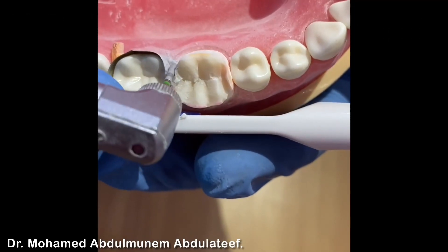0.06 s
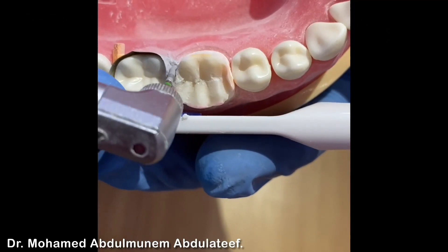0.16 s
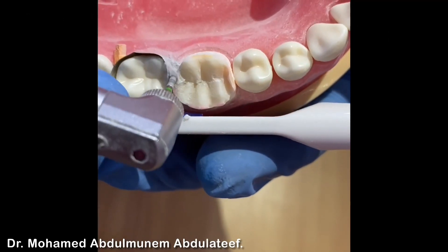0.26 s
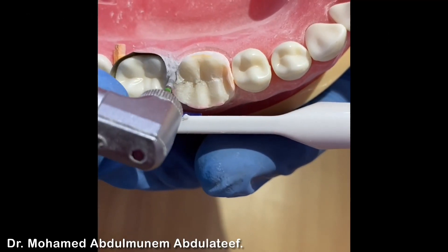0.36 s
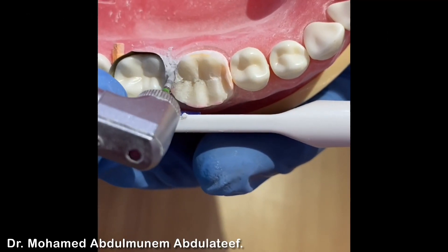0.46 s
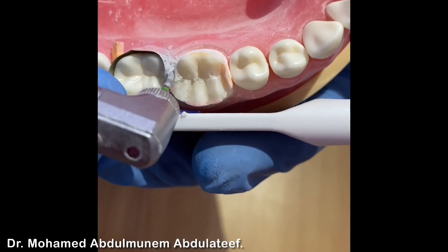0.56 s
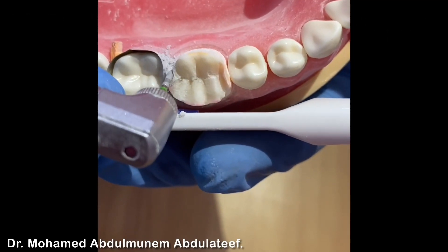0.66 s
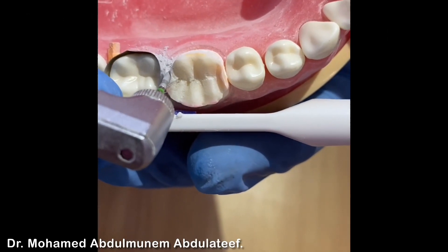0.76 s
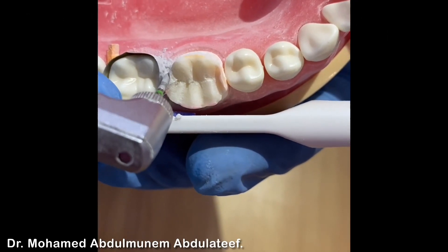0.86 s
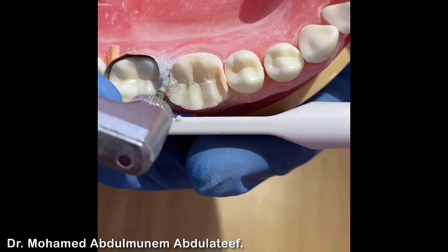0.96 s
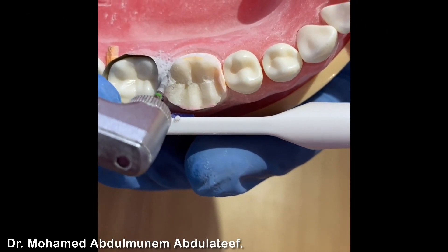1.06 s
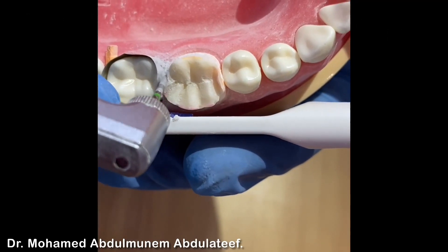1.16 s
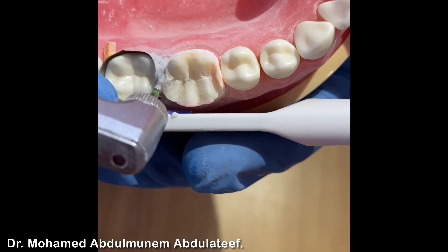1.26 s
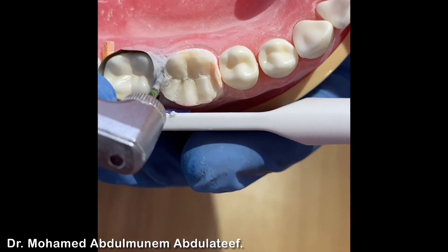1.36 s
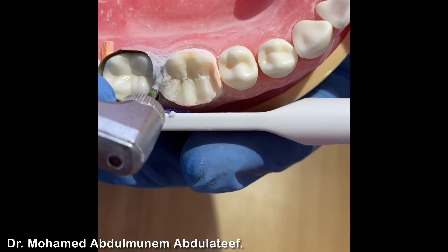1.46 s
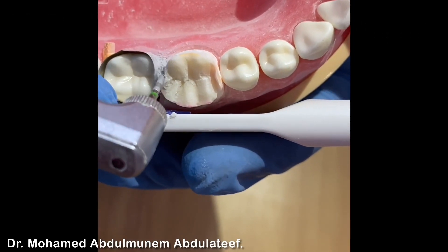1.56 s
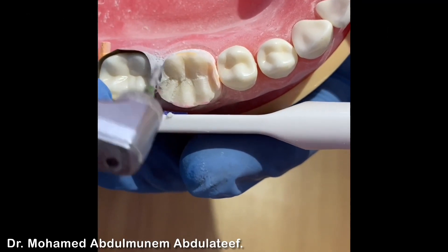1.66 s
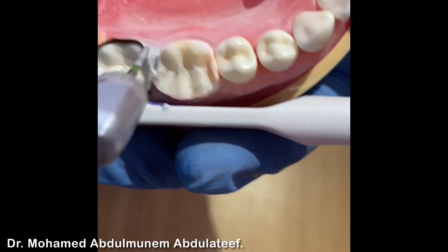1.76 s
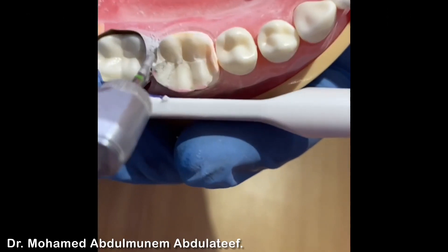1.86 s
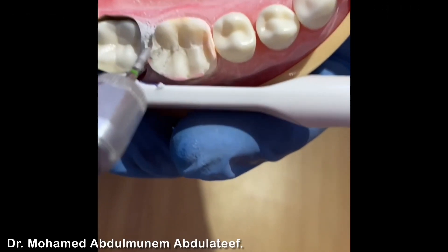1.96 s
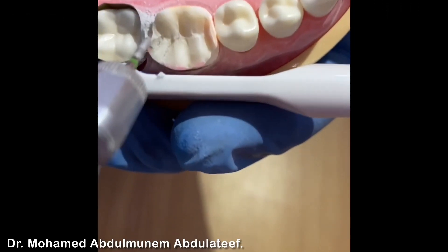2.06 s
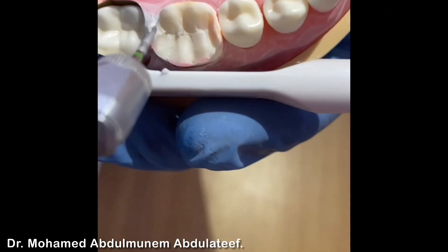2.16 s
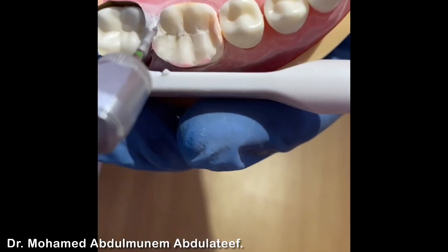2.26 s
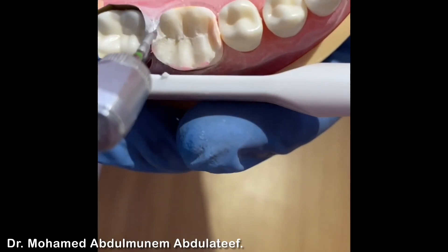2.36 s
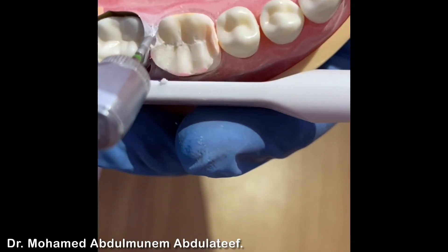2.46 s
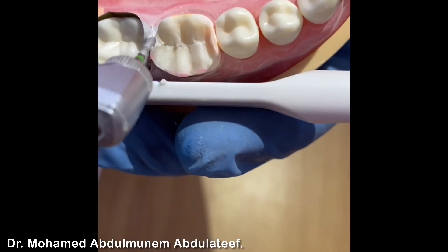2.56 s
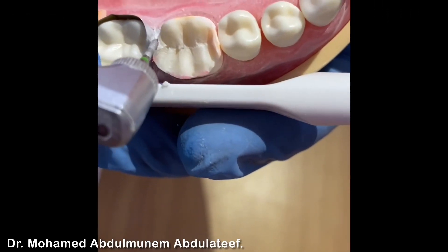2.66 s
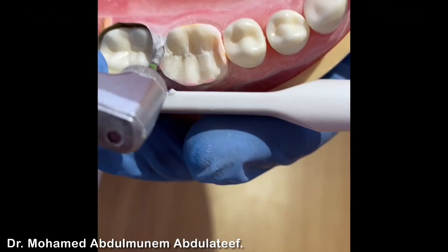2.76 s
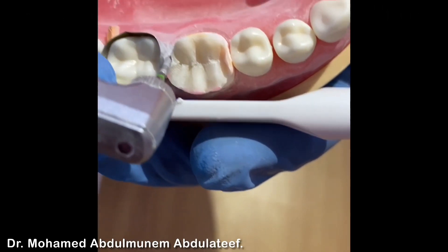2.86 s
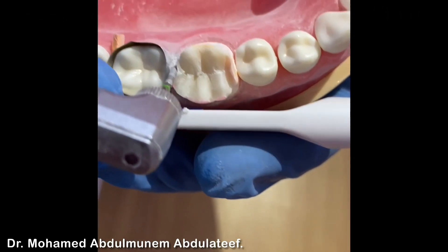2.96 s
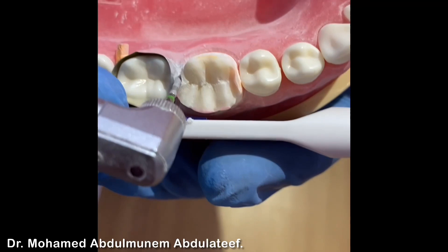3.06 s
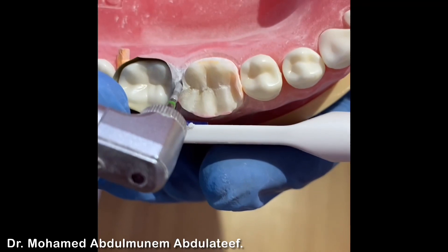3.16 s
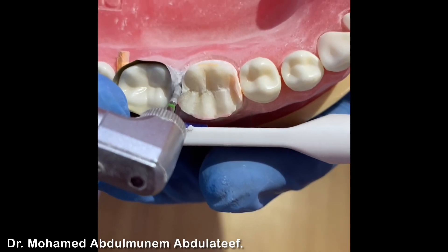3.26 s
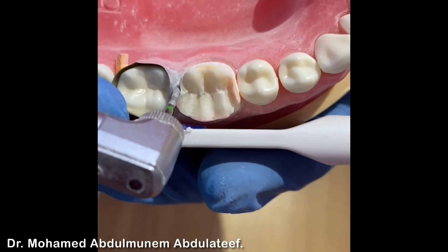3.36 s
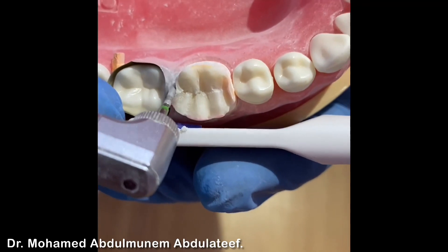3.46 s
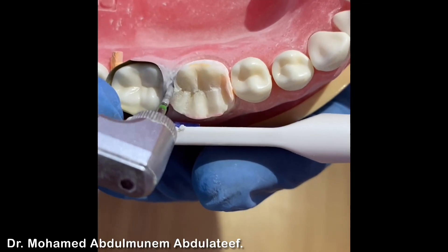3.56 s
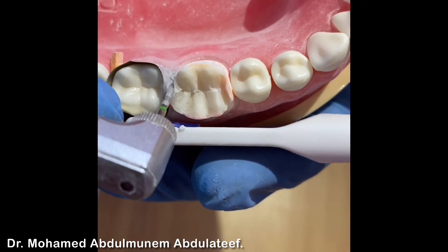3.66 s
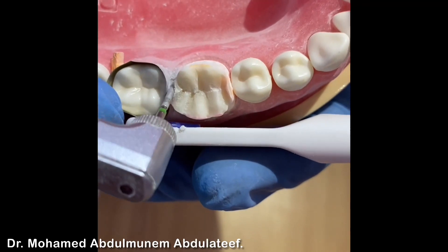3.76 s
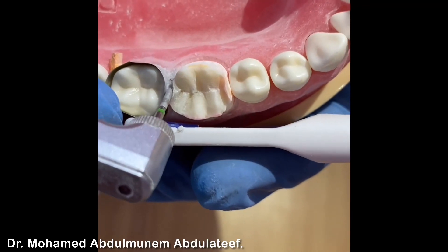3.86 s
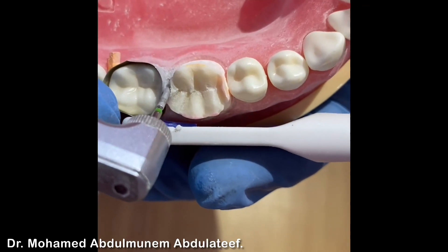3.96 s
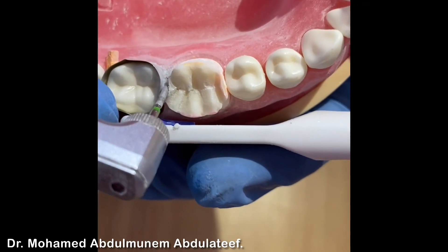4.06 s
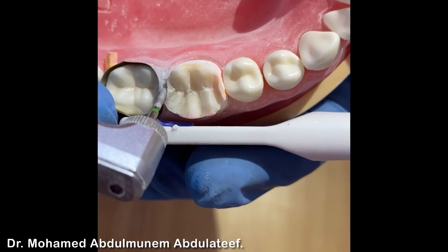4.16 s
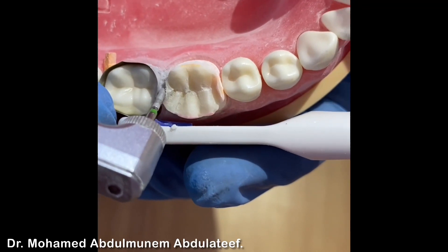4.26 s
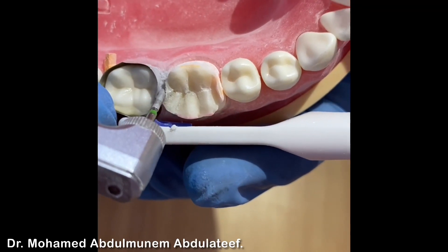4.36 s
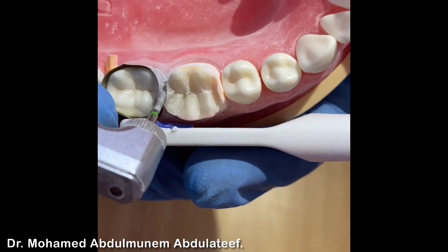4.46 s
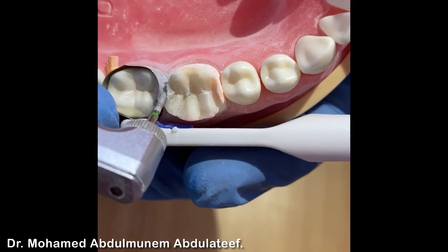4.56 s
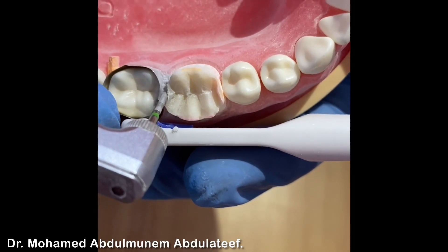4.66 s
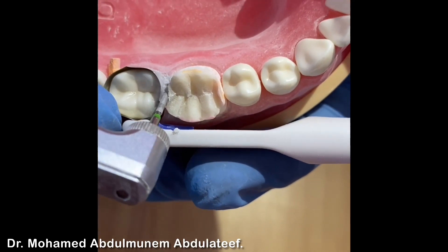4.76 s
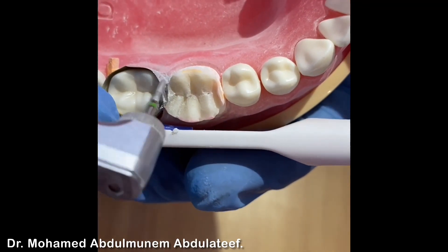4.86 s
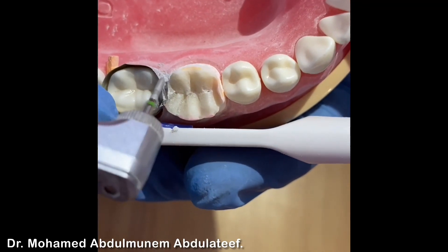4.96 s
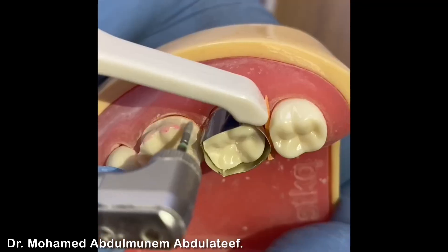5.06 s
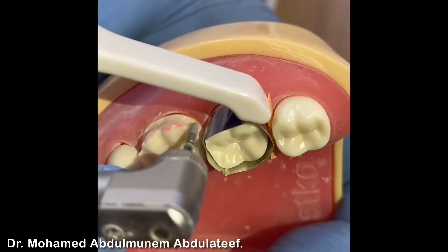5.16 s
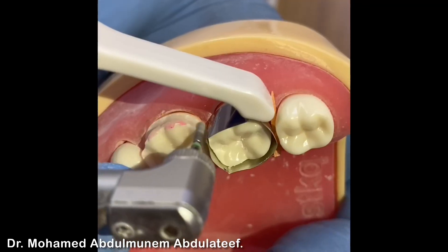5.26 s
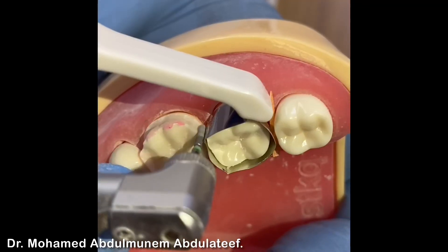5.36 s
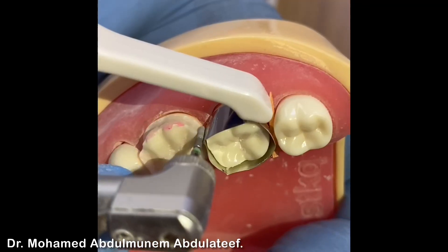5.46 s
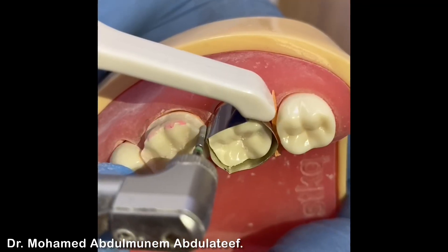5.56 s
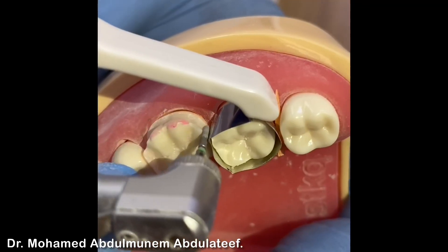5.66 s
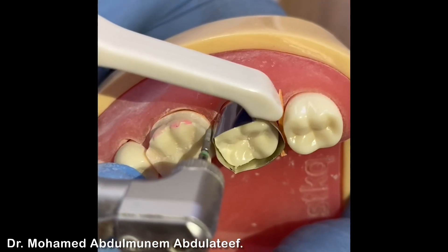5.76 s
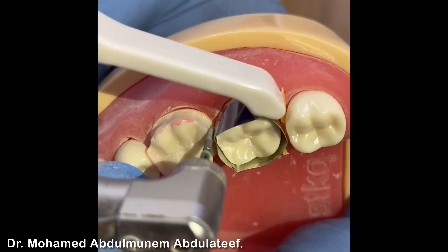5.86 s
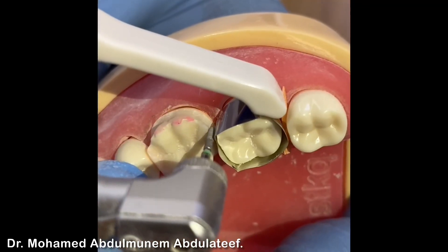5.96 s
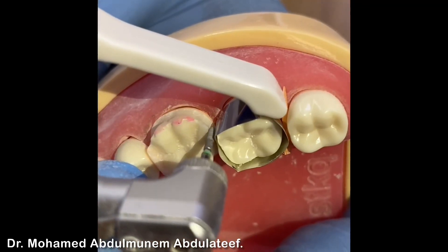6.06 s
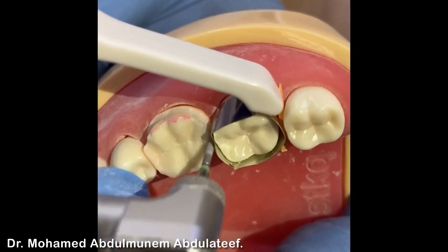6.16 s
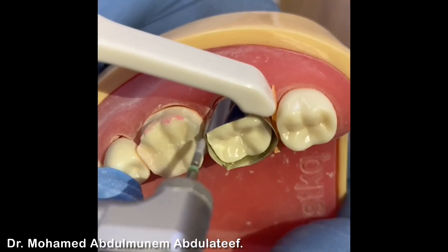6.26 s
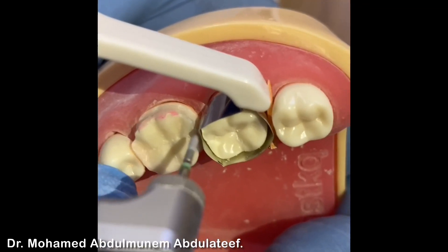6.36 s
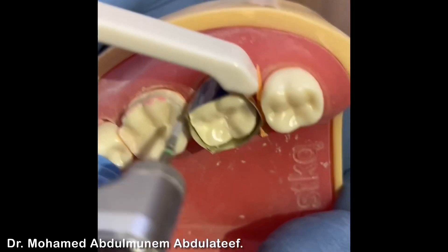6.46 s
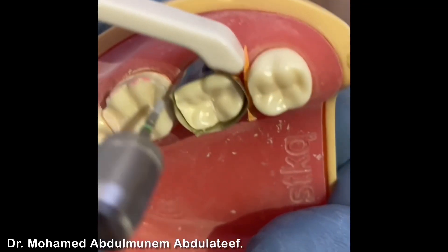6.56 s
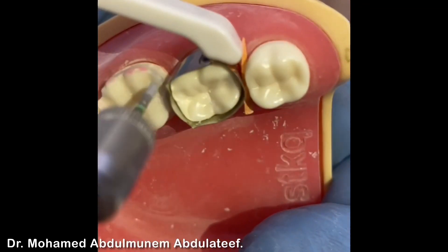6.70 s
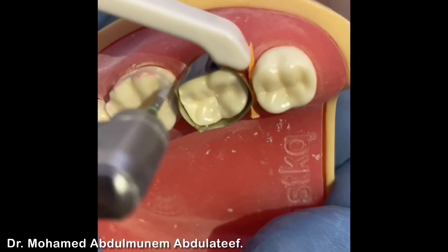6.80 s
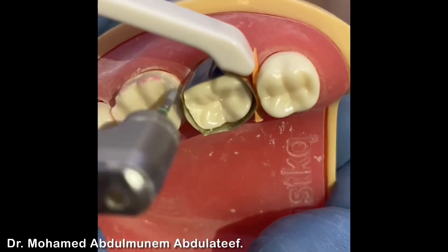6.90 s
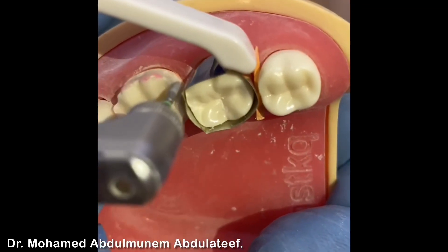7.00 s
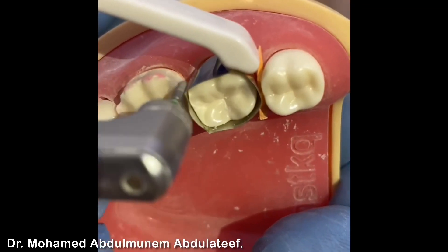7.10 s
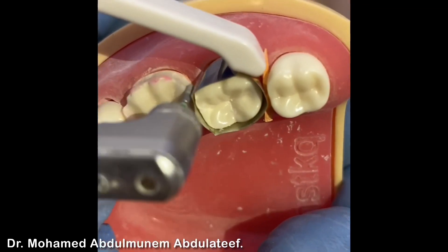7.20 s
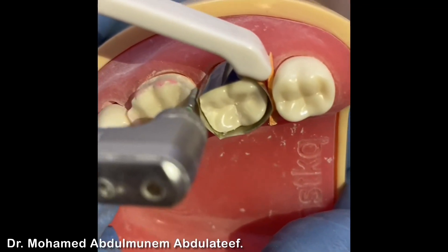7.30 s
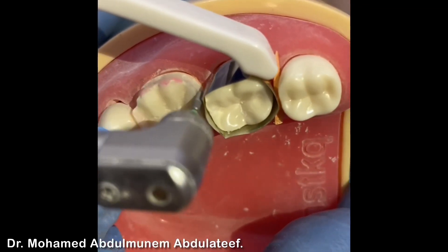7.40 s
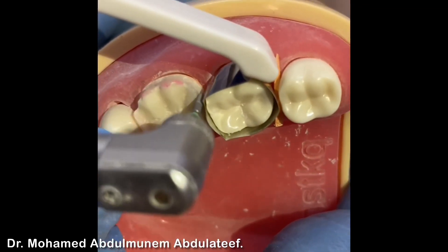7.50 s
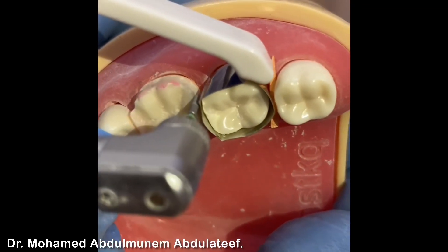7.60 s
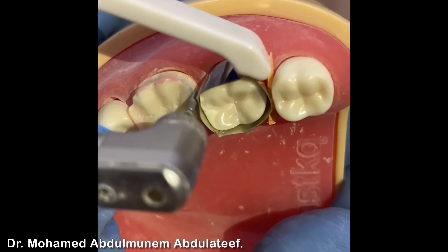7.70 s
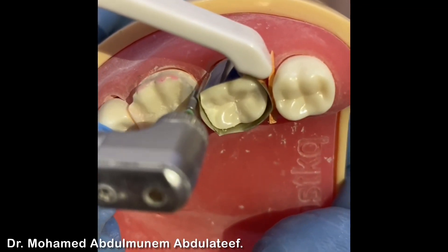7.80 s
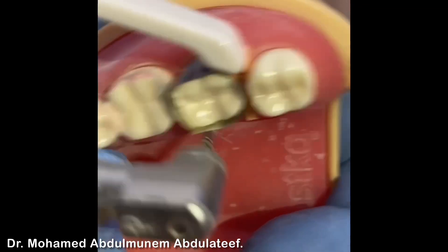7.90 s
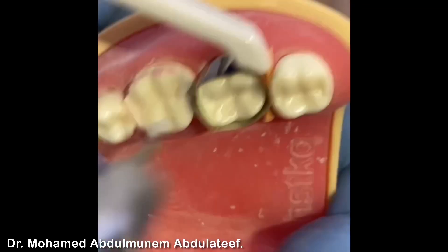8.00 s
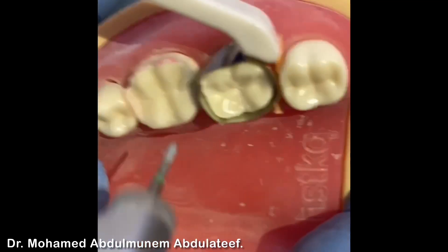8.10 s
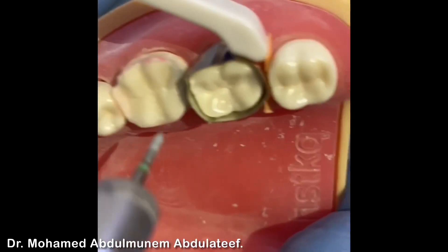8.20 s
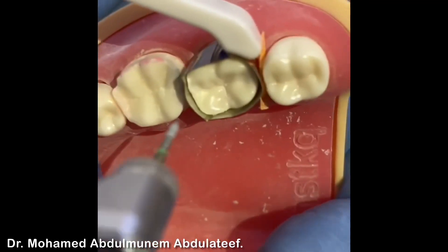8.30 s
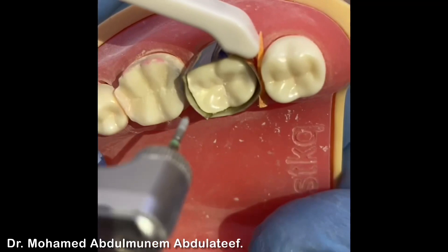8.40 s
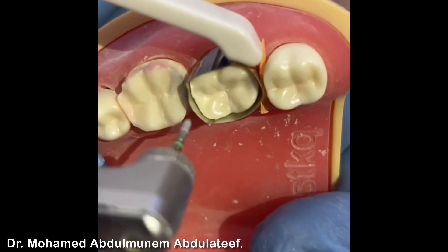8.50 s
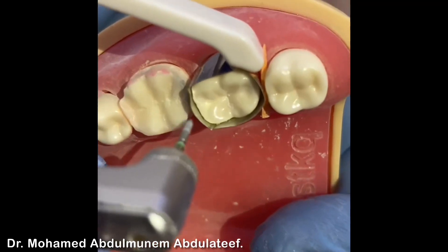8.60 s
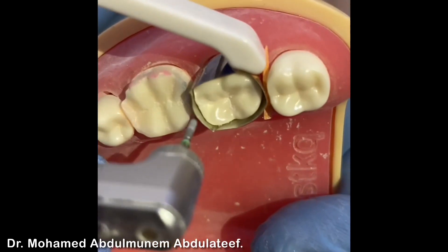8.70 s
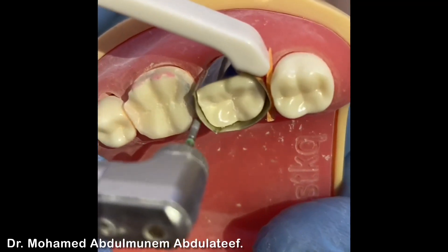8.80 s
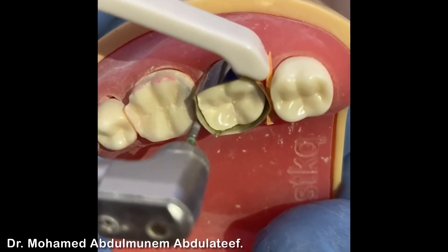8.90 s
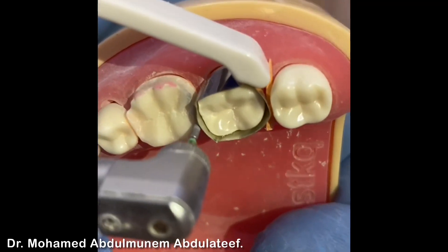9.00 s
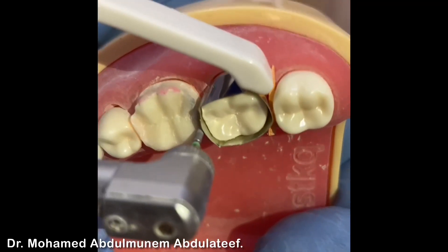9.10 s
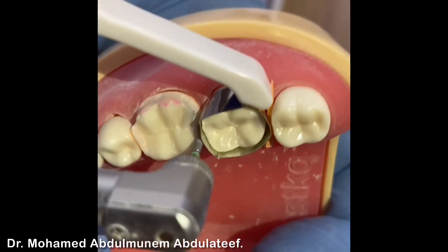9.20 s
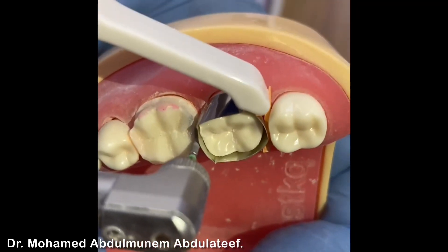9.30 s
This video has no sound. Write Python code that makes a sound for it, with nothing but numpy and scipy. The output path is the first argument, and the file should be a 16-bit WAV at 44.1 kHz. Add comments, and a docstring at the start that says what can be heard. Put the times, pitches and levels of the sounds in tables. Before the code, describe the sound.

A small geared drill whirs and scrapes hard plastic teeth in several passes, slowing under load, with faint air hiss, clicks and a soft wind thump.

```python
"""A bur in a geared dental handpiece cuts a model tooth: its grit scrapes the same pattern every turn.
The scrape is a set of lines at multiples of the turn plus loose grit noise; load drags the speed down.
Gear teeth and motor whine as unsteady sines, catches ring briefly, and drive air hisses as shaped noise.
Air buffets a close microphone pair over a room hum.
Two set-ups follow each other: the first fades to silence, then the second fades in."""
import sys
import numpy as np
from scipy import signal
from scipy.fft import rfft, irfft
from scipy.io import wavfile
from scipy.ndimage import uniform_filter1d

SR = 44100
rng = np.random.default_rng(int(sys.argv[2]) if len(sys.argv) > 2 else 0)


def log_audio(samples):
    """Write samples as a 16-bit WAV file to the path given in sys.argv[1]."""
    # one column per channel
    frames = np.atleast_2d(samples).T
    # limit to full scale, then quantise
    limited = np.clip(frames, -1, 1)
    pcm = np.round(limited * 32767).astype(np.int16)
    wavfile.write(sys.argv[1], SR, pcm)


N = 411894
T = np.arange(N) / SR  # time, s
HZ = np.fft.rfftfreq(N, 1 / SR)  # frequency of each spectral bin

# Drive air and room. Each row: time in seconds, level in dB.
AIR_LEVEL = [(0, -58), (1.2, -61.5), (1.6, -59.5), (2.8, -57.5), (3.5, -63.5), (3.6, -65.5), (4.9, -65.5),
             (5, -54), (6.5, -59), (6.7, -52.5), (7.8, -59), (8.4, -57.5), (9.34, -53.5)]
# Puffs of air on the microphone ports. Each row: centre in seconds, level in dB, half length in seconds.
PUFFS = [(0.632, -51, 0.051), (1.385, -55, 0.13), (2.065, -29, 0.1), (2.309, -37.5, 0.025),
         (2.563, -45, 0.055), (5.9, -53.5, 0.077), (6.062, -49.5, 0.029), (6.562, -53, 0.036),
         (6.75, -61, 0.13), (8.596, -46.5, 0.14)]
# Spectrum of the buffeting. Each row: frequency in Hz, density in dB per Hz.
BUFFET_SPECTRUM = [(20, -40), (52, -1), (90, -3.5), (150, -9.5), (300, -24.5), (1000, -44.5)]
# Brief grazes of the bur. Each row: start in seconds, peak in dB, length in seconds.
GRAZES = [(1.513, -38, 0.0049), (2.55, -37, 0.0092), (2.58, -32, 0.0078), (7.799, -29.5, 0.015)]
# Catches of the bur that tick the tooth. Each row: start in seconds, peak in dB, ring in Hz.
CATCHES = [(2.7751, -17.5, 2270), (2.775, -12, 7350), (3.537, -20.5, 2680), (7.707, -22, 2310)]
# One curve for each pass of the bur, from first touch until the pressure eases off.
# Each row: time in seconds, bur turns in Hz, level in dB.
CUTTING_PASSES = [
    [(0, 445, -31.5), (.35, 357.9, -33.5), (.6, 314, -32.5), (.84, 265.4, -31), (.95, 246.2, -31),
     (1.09, 234.8, -32), (1.36, 236.6, -30.5), (1.39, 241.5, -32.5)],
    [(2.54, 467, -36), (2.63, 461.8, -32), (2.68, 452.4, -26.5), (2.78, 413.3, -25), (2.86, 371.5, -31.5),
     (2.97, 341.3, -33), (3.53, 272.6, -32), (3.56, 266.9, -37.5), (3.72, 265.5, -37), (4.07, 218.6, -38),
     (4.3, 198.8, -37), (4.49, 186.7, -39), (4.55, 197, -38)],
    [(5, 461.6, -42.5), (5.2, 459.2, -31), (5.28, 451.6, -28), (5.62, 415.7, -27), (5.94, 409.2, -30.5)],
    [(6.64, 460, -48), (6.91, 462.6, -38.5), (7, 460.5, -28.5), (7.13, 444.5, -28), (7.26, 425, -29.5),
     (7.5, 391.1, -30), (7.69, 374, -31)],
    [(8.45, 459.3, -40), (8.72, 460.2, -43), (8.82, 457.3, -32.5), (8.93, 443.6, -27.5),
     (9.12, 414.6, -27.5), (9.34, 396.6, -27)],
]
# Eased off, the bur skims on until it leaves the tooth, in every pass but the last.
# Each row: time of leaving in seconds, level in dB.
LEAVINGS = [(1.51, -33), (4.66, -40), (6.05, -40.5), (7.72, -32.5)]
# Spectrum of the cutting, a list per set-up. Each row: frequency in Hz, density in dB per Hz.
CUT_SPECTRA = [
    [(700, -4), (1100, -22), (1550, -14), (2000, -4.5), (2700, -7.5), (3500, -7), (4400, -3), (5500, -3.5),
     (6700, -2.5), (7800, 4), (9500, -5.5), (12000, 1.5), (15500, 1)],
    [(700, -8), (1100, -8.5), (1550, -14), (2000, -7), (2700, -8), (3500, -8.5), (4400, -6), (5500, -8.5),
     (6700, -3.5), (7800, 0.5), (9500, 0), (12000, 0), (15500, -2.5)],
]
# Spectrum of the air, a list per set-up. Each row: frequency in Hz, density in dB per Hz.
AIR_SPECTRA = [
    [(300, -5.5), (700, -13.5), (1300, -10.5), (1560, 4.5), (1850, -3), (2700, -6), (3700, -7.5),
     (4400, -1), (5500, -7), (6700, -7), (7800, -1), (9500, -9), (12000, -1.5), (15500, -12)],
    [(300, -6), (700, -7.5), (1100, -9), (1500, -2.5), (2000, -6), (2700, -5.5), (3500, -7.5), (4400, -3.5),
     (5500, -4), (6700, -9.5), (7800, 4), (9500, -0.5), (12000, -1.5), (15500, -4.5)],
]
# The microphone pair, a list per set-up. Each row: frequency in Hz, phase lead of the left in radians,
# left minus right in dB, unrelated share 0-1.
PORT_PAIRS = [
    [(100, 0, 2.5, 0), (397, 1.5, 3.5, 0.1), (1020, 1, 5, 1), (1664, 3.5, 0.5, 0.59),
     (2460, 5.5, 1.5, 0.27), (3480, 6.5, 3, 0.46), (5900, 8, 0.5, 0.33), (7440, 5, 0, 0.01),
     (17060, -9.5, 0, 0.13)],
    [(254, -0.1, 2, 0.56), (498, 2.5, -2.5, 0.23), (910, 6.5, 6, 0.8), (1300, 6, 3.5, 0.61),
     (2430, 8.5, 4, 0.66), (3100, 6, 3, 0.12), (5200, 6.5, 7.5, 0.63), (7380, 5.5, -0.5, 0),
     (18100, -10.5, 0.5, 0)],
]
# Where the bur works. Each row: end in seconds, boosts of the gear mesh and its 2nd, 3rd and 4th multiple
# in dB, shank thump before load in dB, low and high ring of tooth and jaw in Hz, ring boost in dB,
# locked share 0-1 when pressed in, gain of the thump overtones before bite and load in dB.
WORK_SPOTS = [(.33, 11.5, 18, 4, 4, -46.5, 4630, 5200, 5, 0.51, -38),
              (.75, 8, 13, 19.5, 18, -47.5, 4470, 6900, 5.4, 0.64, -44.5),
              (1.5, 8, 8.4, 9.5, 14, -49, 2450, 5030, 7.5, 0.67, -51.5),
              (2.84, 9.5, 9.9, 6, 2, -58, 5010, 7260, 6.5, 0.72, -58),
              (3.25, 2.5, 12.8, 11, 16, -50, 5050, 5110, 6, 0.7, -48),
              (3.55, 6.5, 5.2, 8.5, 7, -50, 2670, 5050, 13, 0.8, -57),
              (3.85, -7, 2.8, 13, 14, -56.5, 2620, 5340, 9, 0.65, -54),
              (4.955, 13, 7.3, 3, 13.5, -57.5, 4380, 5230, 5.7, 0.59, -55.5),
              (5.5, 1, 2.6, -11, 0, -67, 4060, 6320, 12.6, 0.63, -54.5),
              (6.3, 3, 6.9, -4, 0, -66, 4000, 5840, 6, 0.51, -53),
              (7.24, 2, 4.9, 5, 0, -66, 3960, 6270, 18, 0.54, -50.5),
              (8, -0.5, 16.4, 14, 0, -62, 3000, 6200, 4.3, 0.48, -52),
              (9, 2.5, 2, -5, -1, -68, 4520, 6200, 6.6, 0.58, -61),
              (9.34, 2.5, 3.8, 8, -1, -64, 4030, 7660, 2.9, 0.75, -58.5)]

# Gears and speed
TEETH, MOTOR_TEETH = 11, 10
IDLE_HZ = 467  # turns a second of the free bur
SPIN_UP_S, SPIN_UP_HZ_PER_S, LET_GO_S = .095, 1050, .04  # recovery: settling time, top rate, soft start
WOBBLE, LOADED_WOBBLE = 0.00161, 0.00807  # quick unsteadiness of speed: share free, added at standstill

# Whine; a pair holds one value per set-up
THUMP_DB = [(-5.5, -5.5, -11, -17), (5.5, 13.5, 7.5, 19)]  # relative levels of shank overtones 2-5
MOTOR_DB, MESH_DB = (7.5, 1), (-65, -51.5)  # motor turn over the air level, idle gear mesh
MOTOR_FADE_DB_PER_HZ = (0.06, 0.14)  # the motor line sinks as speed is lost
RUSTLE_DB, RUSTLE_RATE = (1, 0), 220  # gain of the rough third motor multiple, random levels a second

# Scrape
LOCKED_SHARE_FREE, BITE_HZ, HALF_BITE_HZ = 0.018, 467, 11.3  # unpressed; onset speed; loss for half
EASE_S = .05  # unlocking time once the pressure eases
SIDEBAND_SHARE, RING_WIDTH_HZ = 0.42, 150
BLUR_HZ, BLUR_DB = 6900, 4  # locked lines weaken above this corner
# Loose grit below the split dies away as the bur bites and slows
GRIT_LO_HZ, GRIT_SPLIT_HZ, GRIT_CLEAR_DB_PER_HZ = 2180, 4300, .07
TOUCH_S, LIFT_S, FREE_DB = 0.09, .035, -47.5  # landing, leaving, level of the bur spinning free
TICK_T60_S = 0.01

# Air, hum and microphones
HISS_POWER = 2.4  # hiss amplitude goes as this power of the speed
BREEZE_DB = 0.5  # gusty rumble level, relative to the air
HUM_HZ, HUM_WIDTH_HZ, HUM_DB = 99.2, 3.2, 0  # level relative to the air
JOIN_S, FADE_OUT_S, FADE_IN_S = 4.955, 0.073, 0.018
TOP_HZ = 15800  # upper limit of the microphones


def undb(db):
    """Logarithmic level: 20 dB is a tenfold amplitude."""
    return 10 ** (np.asarray(db) / 20)


def curve(rows):
    """Linear interpolation of rows of time and value."""
    return np.interp(T, *np.transpose(rows))


def walk(rate, t=T):
    """Random modulation, slow or fast by its rate a second: normal levels joined by lines, read at t."""
    count = int(N / SR * rate) + 2
    return np.interp(t * rate, np.arange(count), rng.standard_normal(count))


def colour(x, spectrum, lo_hz, hi_hz):
    """Linear filtering of a flat signal; unit noise comes out with rms 1 between lo and hi."""
    f, db = np.transpose(spectrum)
    gain = undb(np.interp(np.log(HZ + 1), np.log(f), db))
    gain = gain * np.clip(HZ / f[0], 0, 1) ** 2  # roll-off below the first row
    band = (HZ > lo_hz) & (HZ < hi_hz)
    rms = np.sqrt(np.sum(gain[band] ** 2) / len(HZ))
    return irfft(rfft(x) * gain / rms, N)


def tone(db, phase):
    """Amplitude modulation: a sine whose level wavers at random."""
    return np.sqrt(2) * undb(db + 2.6 * walk(8.3)) * np.cos(phase)


def ports(x, near, rows):
    """Two-point reception: phase lead, balance, and room echoes that decorrelate all but the near sounds."""
    f, lead, pan_db, share = np.transpose(rows)
    lead = np.interp(HZ, f, lead)
    pan_db = np.interp(HZ, f, pan_db)
    share = np.interp(HZ, f, np.clip(share, 0, 1))
    side = np.array([[1], [-1]]) / 2
    echoes = rng.standard_normal((2, 8192)) * np.exp(-np.arange(8192) / SR / 0.018)
    echoes = np.exp(1j * np.angle(rfft(echoes, N)))  # they scramble the phase and leave the colour
    direct = np.exp(1j * lead * side)
    mix = np.sqrt(1 - share) * direct + np.sqrt(share) * echoes
    return irfft((rfft(x) * mix + rfft(near) * direct) * undb(pan_db * side), N)


def hum():
    """Narrow-band noise: a resonance curve about the hum frequency makes the room's mains hum waver."""
    band = 1 / (1 + ((HZ - HUM_HZ) / HUM_WIDTH_HZ) ** 2)
    return irfft(rfft(rng.standard_normal(N)) * band / np.sqrt(np.mean(band ** 2)), N)


def buffet(air_gain):
    """Turbulent pressure on the ports: gusty rumble with listed puffs, nearly alike on both sides."""
    gain = air_gain * undb(BREEZE_DB + 6.6 * walk(6))
    for centre, db, half in PUFFS:
        gain = gain + undb(db) * np.exp(-((T - centre) / half) ** 4)
    rumble = colour(rng.standard_normal((2, N)), BUFFET_SPECTRUM, 30, 138) * gain * undb(1.8 * walk(25))
    return rumble[0] + 0.28 * rumble[1] * np.array([[1], [-1]])


def drive_air(spectrum, hz):
    """Flow noise: hiss falls by a power law as the motor slows, above a steady low room noise."""
    noise = colour(rng.standard_normal(N), spectrum, 660, 1118)
    room = signal.sosfiltfilt(signal.butter(2, 1200, fs=SR, output="sos"), noise)
    hiss = noise - room
    return room + hiss * (hz / IDLE_HZ) ** HISS_POWER * undb(1.36 * walk(8.7))


def at_spot(column):
    """Local contact property: one value a spot, slewed at the changes."""
    rows = np.array(WORK_SPOTS)
    index = np.minimum(np.searchsorted(rows[:, 0], T), len(rows) - 1)
    return uniform_filter1d(rows[index, column], size=2000)


def speed():
    """Torque balance: load drags each pass down; let go, the bur climbs at a top rate, then settles."""
    hz = curve([row[:2] for rows in CUTTING_PASSES for row in rows])
    knee = SPIN_UP_S * SPIN_UP_HZ_PER_S
    for rows, after in zip(CUTTING_PASSES, CUTTING_PASSES[1:]):
        eased, low, _ = rows[-1]
        touch, free, _ = after[0]
        t = np.maximum(T - eased, 0)
        decay = np.exp(-t ** 2 / (t + LET_GO_S) / SPIN_UP_S)
        back = free - knee * np.arcsinh(np.sinh((free - low) / knee) * decay)
        hz = np.where((T > eased) & (T < touch), back, hz)
    return hz


def bite(hz):
    """Phase locking: the share of the scrape that repeats each turn saturates with lost speed."""
    pressed = 0
    for rows in CUTTING_PASSES:
        pressed = pressed + (T >= rows[0][0]) * np.clip(1 - (T - rows[-1][0]) / EASE_S, 0, 1)
    lost = np.maximum(BITE_HZ - hz, 0) ** 2
    depth = pressed * lost / (lost + HALF_BITE_HZ ** 2)
    return np.clip(LOCKED_SHARE_FREE + (at_spot(column=9) - LOCKED_SHARE_FREE) * depth, 0, 1)


def whine(setup, hz, turn, air_gain):
    """Rotating-machine harmonics: shank thump with overtones, motor turn with rustle, idle gear mesh."""
    load = 1.98 * np.clip(1.1 - hz / IDLE_HZ, 0, 1)  # the shank thumps harder the more it is slowed
    overtones = sum(tone(db, (k + 2) * turn) for k, db in enumerate(THUMP_DB[setup]))
    thump = tone(at_spot(column=5), turn) + bite(hz) * undb(at_spot(column=10)) * overtones
    rotor = turn * TEETH / MOTOR_TEETH
    rustle = walk(RUSTLE_RATE) * np.cos(3 * rotor) + walk(RUSTLE_RATE) * np.sin(3 * rotor)
    motor_gain = undb(MOTOR_DB[setup] - MOTOR_FADE_DB_PER_HZ[setup] * (IDLE_HZ - hz))
    motor = motor_gain * (tone(0, rotor) + undb(RUSTLE_DB[setup]) * rustle)
    return load * thump + air_gain * motor + tone(MESH_DB[setup], turn * TEETH)


def ticks():
    """Damped free vibration: each catch rings the tooth for a few milliseconds."""
    out = 0
    for start, db, ring_hz in CATCHES:
        t = np.maximum(T - start, 0)
        out = out + undb(db - 60 * t / TICK_T60_S) * np.sin(2 * np.pi * ring_hz * t)
    return out


def contact():
    """Contact force as a gain: passes with their landing and leaving, then grazes."""
    rows = [(s, db) for one in CUTTING_PASSES for s, _, db in one]
    landings = [(one[0][0] - TOUCH_S, FREE_DB) for one in CUTTING_PASSES]
    freed = [(s + LIFT_S, FREE_DB) for s, _ in LEAVINGS]
    gain = undb(curve(sorted(rows + landings + LEAVINGS + freed)))
    for s, db, length in GRAZES:
        rise, fall = (T - s) / 0.0018, (s + length - T) / 0.0024 + 1
        gain = gain + undb(db) * np.clip(np.minimum(rise, fall), 0, 1)
    return gain


def locked_scrape(hz, turn):
    """Periodic force as a harmonic series: the grit pattern repeats each turn, with gear mesh and rings."""
    step = slice(0, N, 64)  # line levels are computed at every 64th sample
    t = T[step]
    spot = [at_spot(column)[step] for column in range(len(WORK_SPOTS[0]))]
    low_hz, high_hz, ring_db = spot[6:9]
    locked = 0
    for k in range(6, 68):
        line_hz = k * hz[step]
        db = (1.8 + 0.031 * k) * walk(4.5, t) + 3.64 * walk(14, t)  # each line's level wavers at random
        mesh = round(k / TEETH)
        if 1 <= mesh <= 4 and k == mesh * TEETH:
            db = 0.84 * db + spot[mesh]
        elif 1 <= mesh <= 4 and abs(k - mesh * TEETH) == 1:
            db = db + SIDEBAND_SHARE * spot[mesh]  # run-out of the gear swings the mesh once a turn
        for ring_hz in (low_hz, high_hz):
            db = db + ring_db / (1 + ((line_hz - ring_hz) / RING_WIDTH_HZ) ** 2)
        db = db - BLUR_DB / (1 + (BLUR_HZ / line_hz) ** 8)
        keep = np.clip((TOP_HZ - line_hz) / 100 + 10, 0, 1)  # no lines far above the top
        phase = k * turn + 2 * np.pi * rng.random() + 1.83 * walk(1.523)
        locked = locked + np.interp(T, t, keep * undb(db)) * np.cos(phase)
    # lines spaced hz apart carry the power density of unit noise
    return locked * np.sqrt(4 * hz / SR)


def loose_grit(hz, turn, share):
    """Modulated noise: loose grit swells once a turn and loses its low part as the bur bites and slows."""
    grit = (1 + 0.51 * np.cos(turn)) * undb(2.1 * walk(35)) * rng.standard_normal(N)
    grit = signal.sosfilt(signal.butter(2, GRIT_LO_HZ, "high", fs=SR, output="sos"), grit)
    coarse = signal.sosfiltfilt(signal.butter(4, GRIT_SPLIT_HZ, fs=SR, output="sos"), grit)
    return grit - coarse * (1 - undb(-GRIT_CLEAR_DB_PER_HZ * share * (IDLE_HZ - hz)))


def bur(hz, turn):
    """Power sharing: the cutting force divides between the locked scrape and loose grit."""
    share = bite(hz)
    return np.sqrt(share) * locked_scrape(hz, turn) + np.sqrt(1 - share) * loose_grit(hz, turn, share)


def scene():
    """Superposition: the handpiece through each set-up's microphones, then bass common to both."""
    hz = speed()
    wobble = (WOBBLE + LOADED_WOBBLE * (1 - hz / IDLE_HZ)) * walk(24)
    turn = 2 * np.pi * np.cumsum(hz * (1 + wobble)) / SR  # angle of the bur, radians
    force = bur(hz, turn) * contact()
    air_gain = undb(curve(AIR_LEVEL))
    fades = np.clip((JOIN_S - T) / FADE_OUT_S, 0, 1), np.clip((T - JOIN_S) / FADE_IN_S, 0, 1)
    out = 0
    for k in range(2):
        air = air_gain * drive_air(AIR_SPECTRA[k], hz)
        cutting = colour(force, CUT_SPECTRA[k], 2100, 8010)
        near = whine(k, hz, turn, air_gain) + ticks()
        out = out + fades[k] * ports(cutting + air, near, PORT_PAIRS[k])
    bass = buffet(air_gain) + undb(HUM_DB) * air_gain * hum()
    return out + bass * (fades[0] + fades[1])


def record(dry):
    """Band limiting: a steep low-pass cuts the top."""
    return signal.sosfilt(signal.ellip(10, .2, 75, TOP_HZ, fs=SR, output="sos"), dry)


dry = scene()
out = record(dry)
log_audio(out)
```